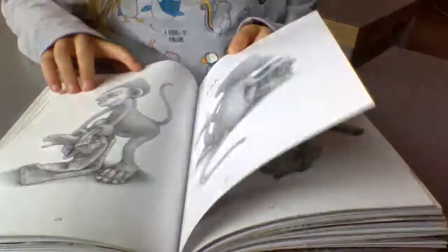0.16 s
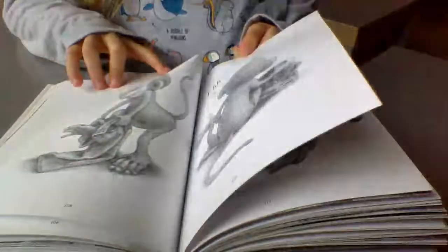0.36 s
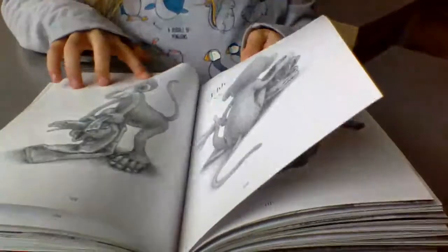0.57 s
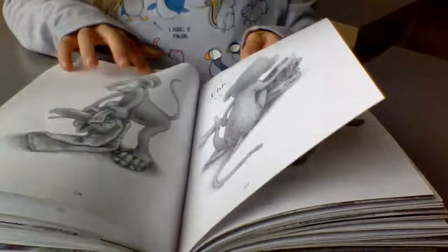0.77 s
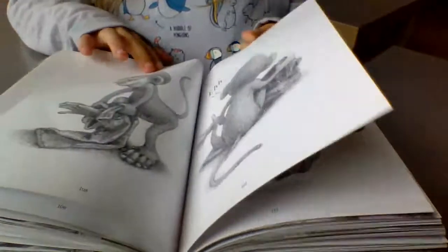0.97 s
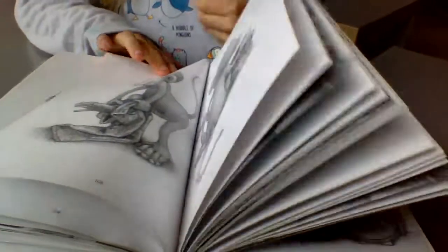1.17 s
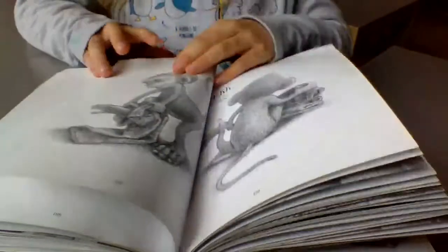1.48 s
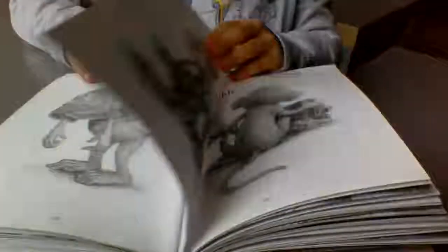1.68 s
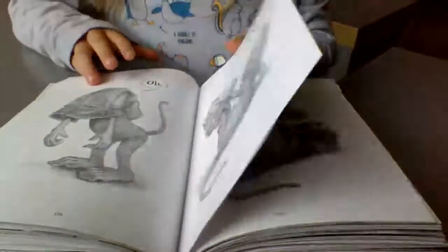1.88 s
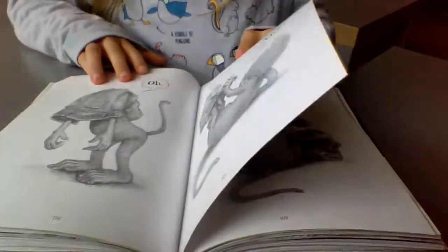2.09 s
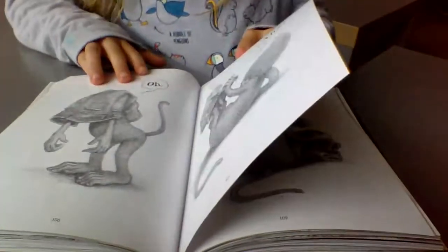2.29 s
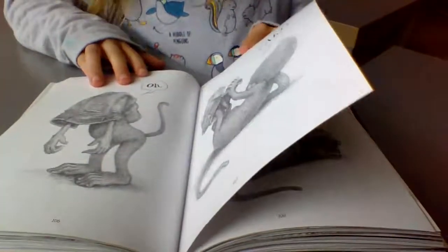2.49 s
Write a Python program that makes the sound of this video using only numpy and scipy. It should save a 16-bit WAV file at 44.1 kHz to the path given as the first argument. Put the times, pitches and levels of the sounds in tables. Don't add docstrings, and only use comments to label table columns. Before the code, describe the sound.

Stiff book pages sliding, hissing and flicking over, corners snapping and fingertips tapping the stack

```python
import sys
import numpy as np
from scipy import signal
from scipy.fft import rfft, irfft, next_fast_len
from scipy.io import wavfile
from scipy.ndimage import uniform_filter1d

SR = 44100
rng = np.random.default_rng(int(sys.argv[2]) if len(sys.argv) > 2 else 0)


def gain_from_db(level_db):
    decades = np.asarray(level_db, float) / 20
    return 10 ** decades


def wav_record(signal):
    frames = np.transpose(np.atleast_2d(signal))
    bounded = np.clip(frames, -1, 1)
    quanta = np.round(bounded * 32767).astype(np.int16)
    wavfile.write(sys.argv[1], SR, quanta)


N = 116865

SNAP_S = 0.0015
CRACK_HZ = 4500


def unit(x):
    return x / np.sqrt(np.mean(x ** 2) + 1e-20)


def peak(x):
    return x / np.abs(x).max()


def along(points, hz):
    f, v = np.transpose(points)
    return np.interp(np.log(hz + 1), np.log(f + 1), v)


def add(into, x, s):
    part = into[round(s * SR):][:len(x)]
    part += x[:len(part)]


def high_pass(x, hz):
    return signal.lfilter(*signal.butter(2, hz, "high", fs=SR), x)


def resonate(x, hz, q):
    return signal.lfilter(*signal.iirpeak(hz, q, SR), x)


def coloured(x, points, rings=()):
    size = next_fast_len(N + 8192)
    hz = np.fft.rfftfreq(size, 1 / SR)
    db = along(points, hz)
    for centre_hz, width_hz, lift_db in rings:
        db = db + lift_db / (1 + (2 * (hz - centre_hz) / width_hz) ** 2)
    return unit(irfft(rfft(x, size) * gain_from_db(db), size)[:N])


def patchy(x, patchy_db):
    z = signal.stft(x, nperseg=256)[2]
    field = uniform_filter1d(rng.standard_normal(z.shape), size=2, axis=0)
    field = uniform_filter1d(field, size=12, axis=1)
    return signal.istft(z * gain_from_db(patchy_db * unit(field)), nperseg=256)[1][:N]


def fibres():
    slips_per_s, spread_db, slip_share = 6000, 3, 0.5
    sizes = gain_from_db(spread_db * rng.standard_normal(N)) * rng.choice([-1, 1], N)
    slips = (rng.random(N) < slips_per_s / SR) * sizes
    return np.sqrt(slip_share) * unit(slips) + np.sqrt(1 - slip_share) * rng.standard_normal(N)


def ring(modes, t):
    out = np.zeros(len(t))
    for hz, db, t60 in modes:
        decay = gain_from_db(db + rng.normal(0, 2.5) - 60 * t / t60)
        out += decay * np.sin(2 * np.pi * hz * rng.normal(1, .04) * t + rng.normal(0, .8))
    return out


def room(x):
    # (frequency [Hz], t60 [s])
    room_t60 = [(200, 0.4), (1000, 0.23), (3000, 0.03), (8000, 0.17)]
    wet_db, delay_s = -19, 0.005
    hz, t, z = signal.stft(rng.standard_normal(SR // 4), SR, nperseg=128)
    tail = signal.istft(z * gain_from_db(-60 * t / along(room_t60, hz)[:, None]), SR, nperseg=128)[1]
    wet = signal.fftconvolve(x, tail / np.linalg.norm(tail))
    wet = np.pad(wet, (round(delay_s * SR), 0))
    return np.pad(x, (0, len(wet) - len(x))) + gain_from_db(wet_db) * wet


def floor():
    # (frequency [Hz], density [dB per Hz])
    floor_spectrum = [(25, 1.5), (120, -3.5), (200, -0.5), (300, -15.5), (700, -13.5), (2500, -22.5),
                      (7000, -27.5), (11300, -15), (16000, -19.5)]
    # (frequency [Hz], rms level [dB])
    whine_tones = [(8000, -90), (11590, -87)]
    floor_db = -68
    t = np.arange(N) / SR
    out = gain_from_db(floor_db) * coloured(rng.standard_normal(N), floor_spectrum)
    for hz, db in whine_tones:
        out += gain_from_db(db + 3) * np.sin(2 * np.pi * hz * t)
    return out


def shifts():
    # (time [s], length [s], level [dB])
    shift_events = [(0.119, 0.12, -56.5), (0.216, 0.11, -48.5), (0.827, 0.11, -54), (0.94, 0.15, -55),
                    (1.309, 0.052, -66.5), (1.459, 0.064, -41.5), (1.58, 0.12, -66), (1.682, 0.2, -56.5),
                    (1.866, 0.092, -70), (1.956, 0.14, -55.5), (2.168, 0.12, -62.5), (2.4, 0.17, -63)]
    # (frequency [Hz], density [dB per Hz])
    stack_spectrum = [(100, -29.5), (190, -0.5), (300, -5.5), (550, -2), (850, -11), (1300, -36.5)]
    t, gain = np.arange(N) / SR, np.zeros(N)
    for s, length_s, db in shift_events:
        u = np.clip((t - s) / length_s, 0, 1)
        gain += gain_from_db(db) * np.sin(np.pi * u ** 0.51) ** 2
    return gain * coloured(patchy(fibres(), patchy_db=3), [(30, -80)] + stack_spectrum + [(4000, -90)])


def thumps():
    # (time [s], peak [dB], deepest modes re peak [dB])
    thump_events = [
        (.207, -21, -4.5),
        (0.672, -32, -8),
        (.792, -29.5, -8),
        (.908, -32.5, -9),
        (0.944, -26.5, -4),
        (1.464, -31.5, -13),
        (1.698, -56, -5),
        (2.092, -36, -9),
        (2.396, -46.5, -6),
    ]
    # (frequency [Hz], level [dB], t60 [s])
    table_modes = [(96, -4.5, 0.14), (144, -2, 0.11), (198.3, -9, 0.16), (255, -14.5, 0.13),
                   (432, -16, 0.062)]
    deep_hz = 170
    out, t = np.zeros(N), np.arange(SR // 4) / SR
    onset = 1 - np.exp(-t / (2 * SNAP_S))
    for s, db, deep_db in thump_events:
        modes = [(hz, level + deep_db * (hz < deep_hz), t60) for hz, level, t60 in table_modes]
        add(out, gain_from_db(db) * ring(modes, t) * onset, s)
    return out


def pitched(events):
    out, t = np.zeros(N), np.arange(SR // 4) / SR
    for s, db, hz, t60 in events:
        envelope = gain_from_db(db - 60 * t / t60) * (1 - np.exp(-2 * t * hz))
        add(out, room(-envelope * np.sin(2 * np.pi * hz * t)), s)
    return out


def knocks():
    return pitched([(0.209, -25, 464, 0.059), (0.7918, -23.5, 560, 0.016), (1.718, -21, 1737, 0.023),
                    (1.97, -37.5, 540, 0.056), (2.063, -20.5, 616, 0.017), (2.0924, -16, 569, 0.021),
                    (2.1487, -15.5, 850, 0.011), (2.3945, -16, 798, 0.0091)])


def creaks():
    # (time [s], peak [dB], pitch [Hz])
    creak_slips = [(.0095, -40, 800), (1.591, -39, 1160), (1.604, -36, 1370), (1.6147, -35, 1150),
                   (1.62, -33, 1770), (1.628, -36, 1480), (1.634, -31, 1220), (1.6402, -29, 1250)]
    t60_s = 0.014
    return pitched([(s, db, hz, t60_s) for s, db, hz in creak_slips])


def scrapes():
    # (time [s], length [s], level [dB], first pitch [Hz], last pitch [Hz])
    scrape_events = [
        (1.69, 0.045, -36, 1660, 1820),
        (1.952, .018, -40, 2530, 1690),
        (1.96, 0.04, -39.5, 1540, 490),
    ]
    stutters_per_s = 700
    out, t = np.zeros(N), np.arange(SR // 50) / SR
    for s, length_s, db, first_hz, last_hz in scrape_events:
        many = round(stutters_per_s * length_s)
        for k, (late, size, off) in enumerate(rng.random((many, 3))):
            u = (k + late) / many
            hz = first_hz * (last_hz / first_hz) ** u * (.9 + off / 5)
            level = gain_from_db(db + 9.4 * size) * np.sin(np.pi * u) ** .5
            pulse = t * hz * np.exp(-t * hz) * np.sin(2 * np.pi * hz * t)
            add(out, level * pulse, s + u * length_s)
    return room(out)[:N]


def ticks():
    # (time [s], peak [dB])
    tick_events = [(0.1713, -11.5), (0.173, -22), (1.2119, -2.5), (1.4628, -6.5), (1.4675, -13),
                   (2.1145, -20.5)]
    hz, t60_s = 13200, 0.0025
    out, t = np.zeros(N), np.arange(SR // 100) / SR
    for s, db in tick_events:
        click = ring([(hz, 0, t60_s), (hz / 2, -20, t60_s)], t)
        add(out, room(gain_from_db(db - 3.5) * click), s)
    return high_pass(out, CRACK_HZ)


def snaps():
    # (time [s], peak [dB], pitch [Hz], crack re peak [dB],
    # book body re corner [dB])
    snap_events = [(0.1855, -40.5, 880, -1.5, -12), (0.2024, -29.5, 1540, 6, 1),
                   (0.2065, -28.5, 702, -15, -7.5), (0.6708, -14, 2670, -3, -9),
                   (0.6952, -28.5, 890, -19.5, -4.5), (0.7185, -36.5, 1520, -18, -6.5),
                   (0.791, -10, 3510, -4.5, -22.5), (0.7913, -13, 3040, -6.5, -10.5),
                   (0.8008, -26, 2600, -16, 1), (0.8026, -31, 3540, -16, 0),
                   (0.8083, -27, 1670, -21, -7.5), (0.9072, -9, 2760, -7.5, -11.5),
                   (0.91, -20, 1540, -12.5, -23), (0.919, -23.5, 2260, -10, -5.5),
                   (0.9417, -11.5, 3400, -9, -8.5), (0.9429, -14.5, 2700, -4, -13),
                   (0.9584, -12, 2670, -8.5, -15.5), (1.463, -25.5, 1900, 9, -9.5),
                   (1.4662, -26, 1850, 10, -5.5), (1.4784, -26.5, 2420, -5.5, -18.5),
                   (1.4826, -21.5, 3060, -0.5, -15), (1.489, -30.5, 3000, 1, -17),
                   (0.0396, -37, 2530, -7, -2), (0.051, -37, 2600, -8, -3), (1.6592, -25.5, 1830, -15, -33),
                  (1.6979, -24, 1790, 4, -16), (1.7232, -22, 3300, -0.5, -15), (1.797, -43, 1800, 1, -5.5),
                  (1.9656, -28, 2250, -17, -17), (1.9668, -29.5, 1640, -16.5, -5),
                  (2.0625, -24, 3500, -10.5, -18.5), (2.0636, -25.5, 2650, -14.5, -20),
                  (2.081, -40, 3600, -13.5, -2), (2.0931, -16, 2770, -12, -6), (2.106, -32.5, 2280, -13, 5),
                  (2.106, -49, 2487, 1.5, -8), (2.1162, -37, 3020, 1, 0), (2.118, -38.5, 3600, 2, -15),
                  (2.1487, -22.5, 2570, -9, 2), (2.159, -36, 2410, -8, 6.5), (2.2263, -53, 2430, 0, 4.5),
                  (2.3944, -24, 2590, -14, 4), (2.46, -52.5, 2950, -0.5, -4.5),
                  (2.52, -57.5, 2990, -18.5, 2), (2.539, -60, 3050, -9.5, -3),
                  (2.6391, -44.5, 3130, -8, -13)]
    # (frequency [Hz], level [dB], t60 [s])
    book_modes = [(390, -13, .022), (580, 1, .02), (820, 3, .016), (1150, 4, .013), (1550, 1, .012)]
    lead_db, corner_q = -20, 3
    crack_t60_s, crack_top_hz = 0.007, 10900
    rattle_per_s, rattle_db, rattle_t60_s, rattle_top_hz = 2500, -19, 0.17, 2200
    out, cracks, t = np.zeros(N), np.zeros(N), np.arange(SR // 8) / SR
    dull = signal.butter(2, rattle_top_hz, fs=SR)
    release = round(SNAP_S * SR)
    since = t - SNAP_S
    crack_db_curve = -60 * np.abs(since) / crack_t60_s * np.where(since < 0, 2, 1)
    for s, db, hz, crack_db, body_db in snap_events:
        slips = gain_from_db(lead_db) * rng.standard_normal(len(t)) * (t / SNAP_S) * np.exp(-(t / SNAP_S) ** 2)
        slips[release] = -2
        corner = resonate(resonate(slips, hz, corner_q), hz, corner_q)
        crack = rng.standard_normal(len(t)) * gain_from_db(crack_db_curve)
        body = np.roll(ring(book_modes, t) * (1 - np.exp(-4 * t / SNAP_S)), release)
        knock = peak(corner) + gain_from_db(body_db) * peak(body)
        hits = (rng.random(len(t)) < rattle_per_s / SR) * rng.standard_normal(len(t))
        hits = hits * gain_from_db(rattle_db - 60 * t / rattle_t60_s)
        rattle = signal.lfilter(*dull, signal.fftconvolve(knock, hits)[:len(t)])
        add(out, room(gain_from_db(db) * (knock + rattle)), s - SNAP_S)
        add(cracks, gain_from_db(db + crack_db) * peak(crack), s - SNAP_S)
    cracks = high_pass(cracks, CRACK_HZ)
    cracks = signal.lfilter(*signal.butter(1, crack_top_hz, fs=SR), cracks)
    return out + room(2 * cracks)[:N]


def phone_colour(x):
    # (frequency [Hz], width [Hz], lift [dB])
    blow_rings = [(2700, 600, 3), (4150, 450, -10), (5150, 350, -9), (5650, 400, 4), (6780, 400, 5)]
    for hz, width_hz, lift_db in blow_rings:
        x = x + (gain_from_db(lift_db) - 1) * resonate(x, hz, hz / width_hz)
    return x


def strokes():
    # (time [s], sliding level [dB], sheet flexing re sliding [dB])
    finger_strokes = [
        [(.19, -52, -20), (.235, -40, -2.5), (.26, -29.5, -10), (.33, -23, -15), (.4, -31.5, -4),
         (.42, -37, -4.5), (.455, -37.5, -16), (.49, -55, -3)],
        [(.49, -48, -7), (.51, -50, -6), (.522, -28.5, -12.5), (.6, -24.5, -18.5), (.635, -28.5, -26),
         (.665, -37, 0), (.7, -76, 19)],
        [(1.4, -79, 3), (1.45, -42.5, -9.5), (1.459, -46, -24), (1.468, -38, 7.5), (1.505, -34, -37),
         (1.525, -50, -58), (1.55, -55, -24)],
        [(1.91, -63, -20), (1.96, -42, -22), (1.985, -48.5, 4), (2.005, -55.5, -9), (2.055, -63.5, 5),
         (2.1, -45, -11), (2.12, -30, -11), (2.126, -70, 3), (2.24, -70, 2)],
        [(2.6, -98.5, -6.5), (2.632, -74.5, -1), (2.65, -54.5, -8)],
    ]
    page_strokes = [
        [(0, -55, -6), (.06, -45.5, -14.5), (.085, -53, -2), (.125, -45, -7.5), (.165, -55.5, -2),
         (.19, -41, -3)],
        [(.7, -41, -14), (.72, -51, -25), (.745, -42, -45), (.77, -53, -4), (.805, -43, 16), (.83, -65, -30),
         (.89, -55, 8)],
        [(.89, -53, -38), (.903, -34.5, 1), (.915, -42, 0), (.938, -37, -10), (.95, -39, 3), (.962, -31.5, -50),
         (1.11, -32, -13.5), (1.24, -39, -11), (1.345, -37.5, -10), (1.4, -65, 8.5)],
        [(1.55, -57, 2), (1.6, -40.5, -19), (1.64, -55, 0.5), (1.66, -40, -5), (1.68, -35, -24),
         (1.72, -41, 4.5), (1.79, -37.5, -26), (1.86, -42.5, -45), (1.91, -66, -21)],
    ]
    # (frequency [Hz], density [dB per Hz])
    skin_spectrum = [(290, -67.5), (500, -47), (1180, -7.5), (1600, -2.5), (3390, -5.5), (5710, 2.5),
                     (7860, -3.5), (13600, 5), (16000, -6)]
    # (frequency [Hz], density [dB per Hz])
    sheet_spectrum = [(410, -76.5), (700, -44.5), (1050, -5.5), (1440, -12.5), (4860, -3.5), (5540, 0.5),
                      (8100, -6.5), (10500, 1.5), (16000, -4.5)]
    # (frequency [Hz], width [Hz], lift [dB])
    sheet_rings = [(1743, 450, 13), (5860, 260, 1.5), (6920, 120, 7.5)]
    # (frequency [Hz], level [dB])
    flex_spectrum = [(300, -21.5), (700, -11), (1100, 3), (1800, 1), (2800, 1.5), (3700, 0), (4500, -17)]
    skin = coloured(patchy(fibres(), patchy_db=2.8), skin_spectrum)
    sheet = coloured(patchy(fibres(), patchy_db=2.2), sheet_spectrum, sheet_rings)
    flex = coloured(patchy(fibres(), patchy_db=3), [(50, -80)] + flex_spectrum + [(9000, -66)])
    t, out = np.arange(N) / SR, np.zeros(N)
    for tables, surface in [(finger_strokes, skin), (page_strokes, sheet)]:
        for rows in tables:
            s, level_db, flex_db = np.transpose(rows)
            gain = gain_from_db(np.interp(t, s, level_db, left=-150, right=-150))
            slide = surface + gain_from_db(np.interp(t, s, flex_db)) * flex
            out += uniform_filter1d(gain, size=88) * slide
    return room(out)[:N]


def scene():
    mic_low_hz, top_hz = 131, 15850
    near = shifts() + thumps() + knocks() + creaks() + scrapes() + phone_colour(snaps()) + strokes()
    mix = high_pass(near, mic_low_hz) + floor()
    limited = irfft(rfft(mix) * (np.fft.rfftfreq(N, 1 / SR) < top_hz), N)
    return (limited + ticks())[None]


def band_limit(x):
    return signal.sosfilt(signal.butter(12, 16970, fs=SR, output="sos"), x)


def record(dry):
    return band_limit(dry)


dry = scene()
out = record(dry)
wav_record(out)
```